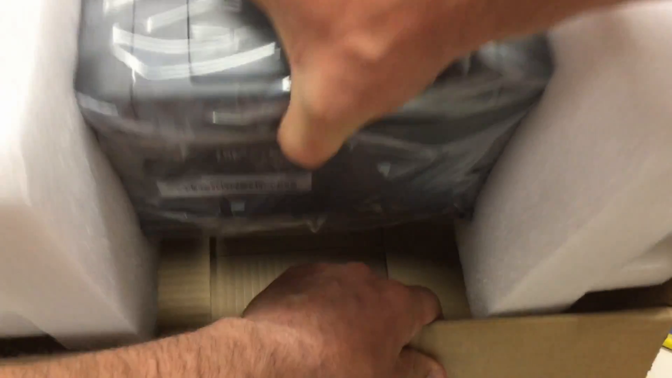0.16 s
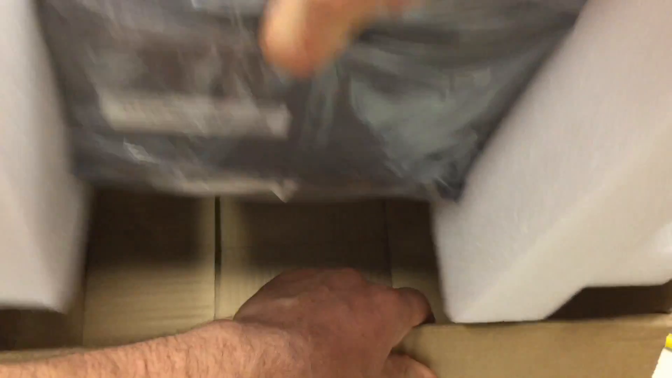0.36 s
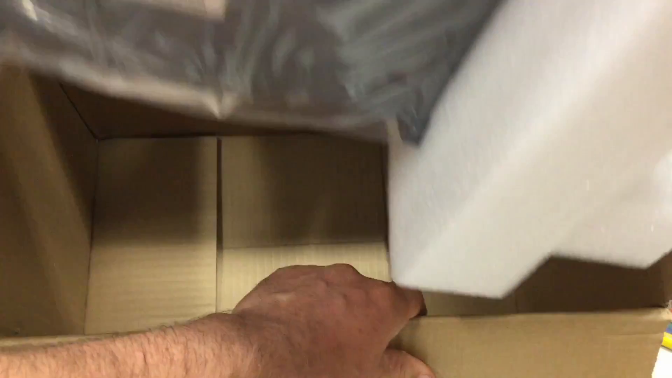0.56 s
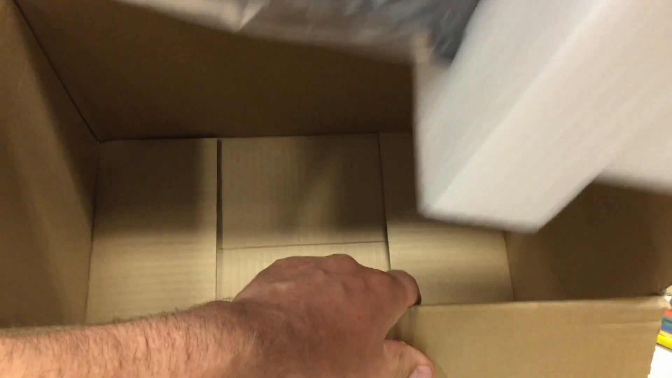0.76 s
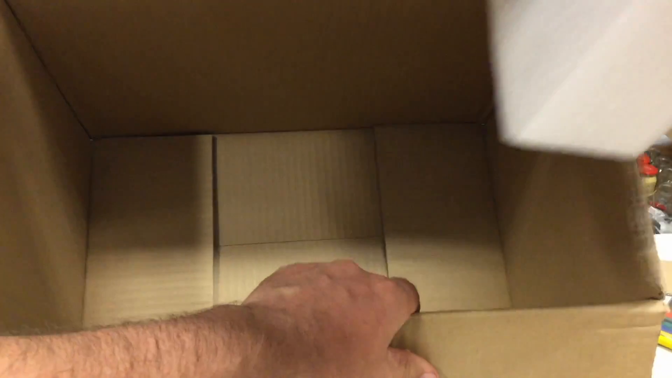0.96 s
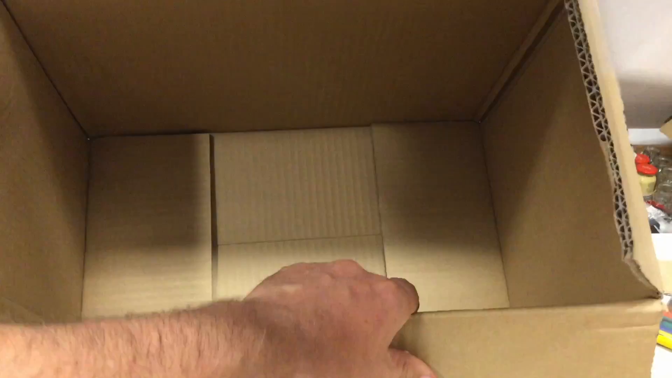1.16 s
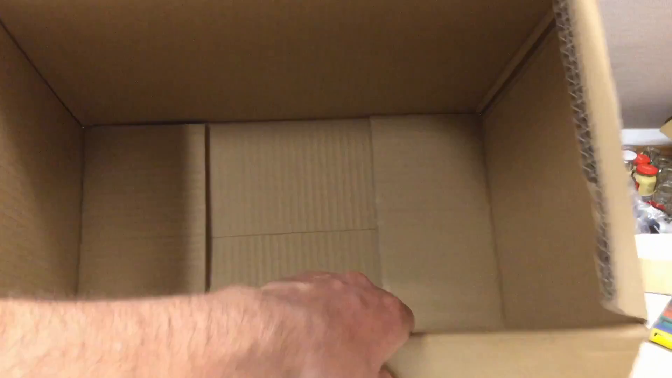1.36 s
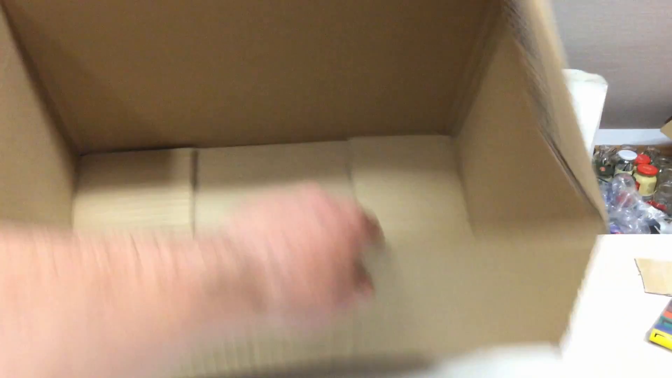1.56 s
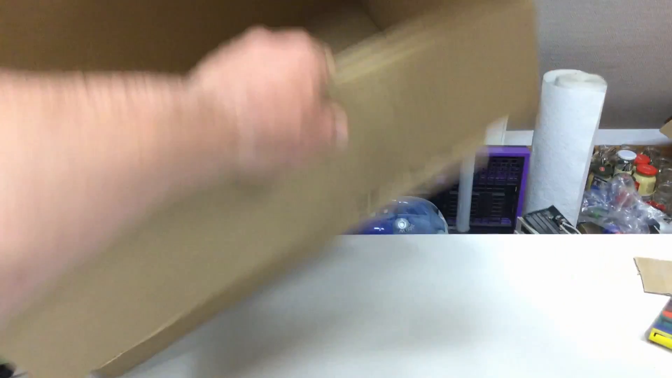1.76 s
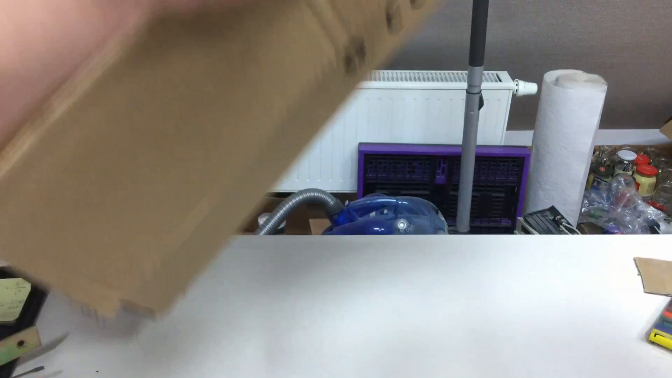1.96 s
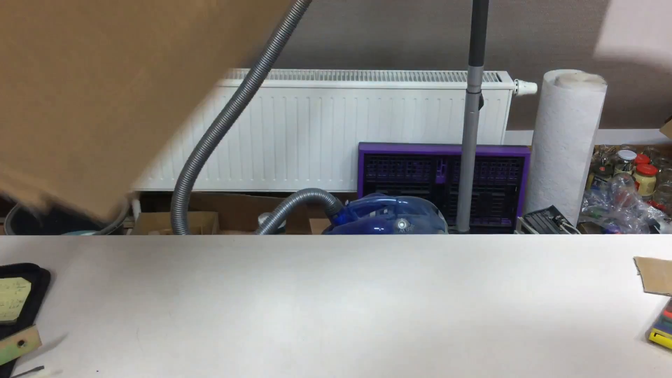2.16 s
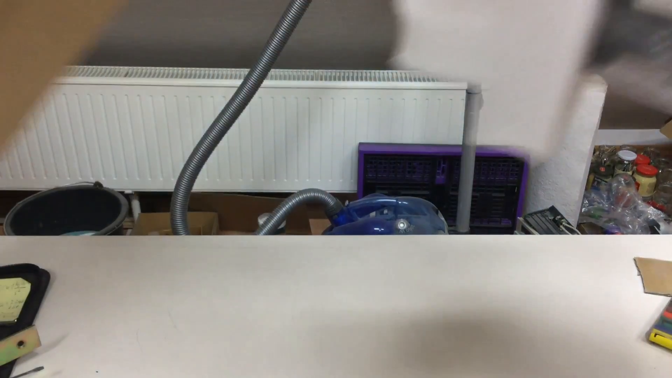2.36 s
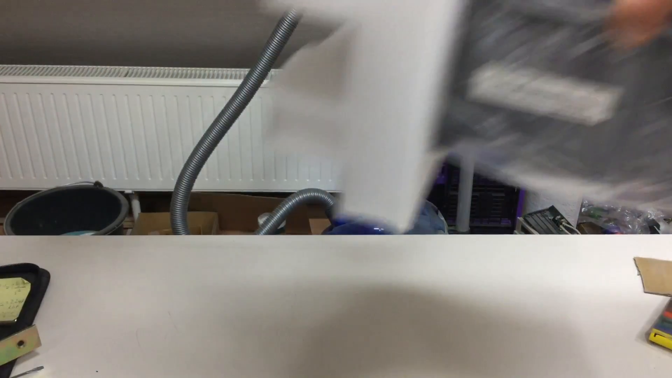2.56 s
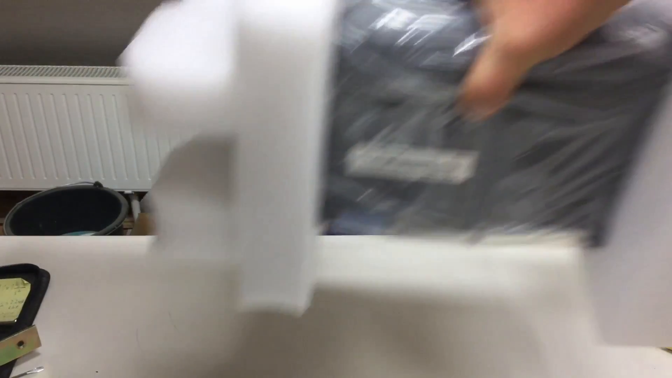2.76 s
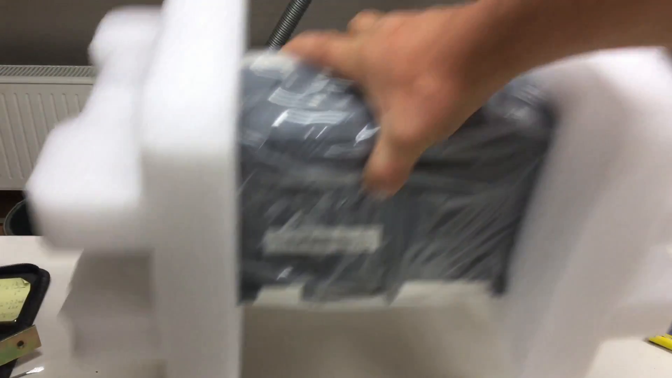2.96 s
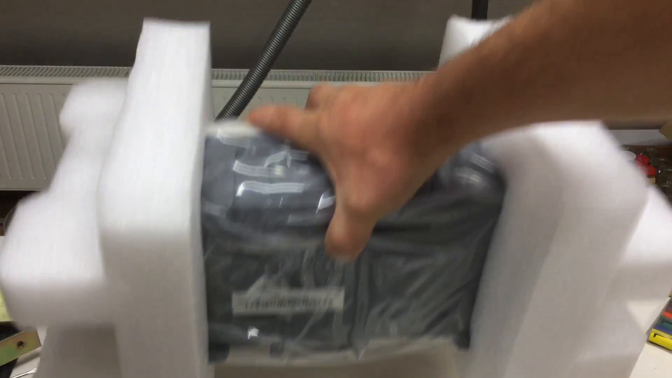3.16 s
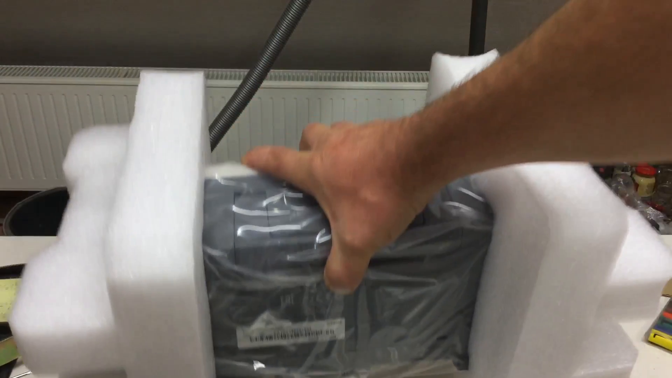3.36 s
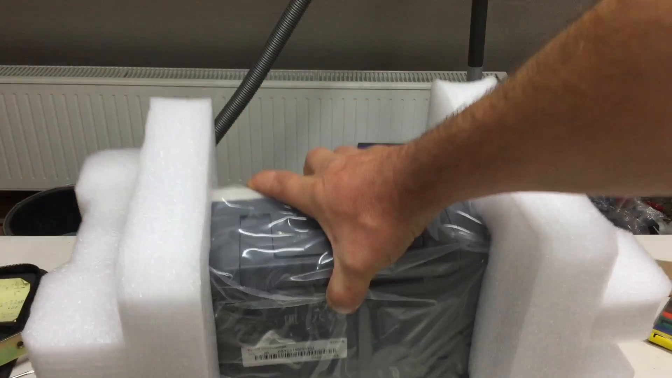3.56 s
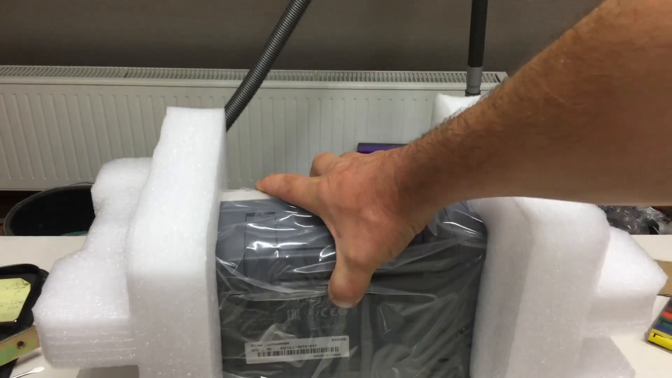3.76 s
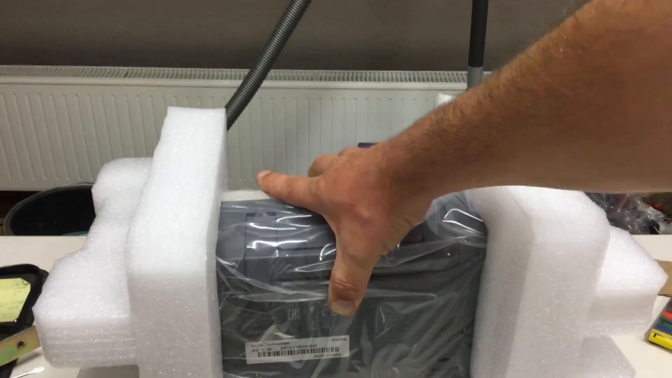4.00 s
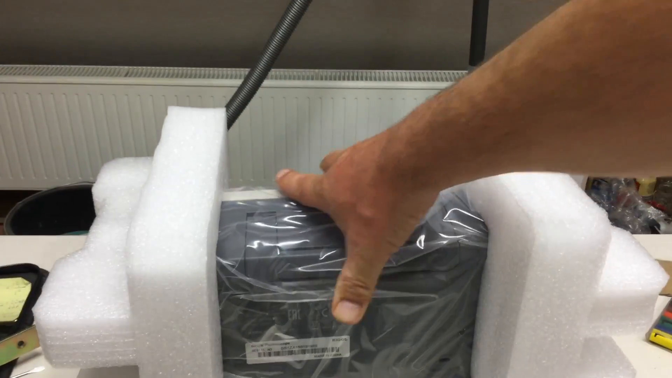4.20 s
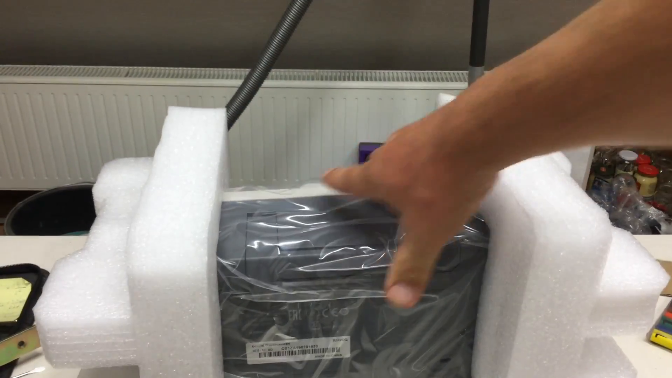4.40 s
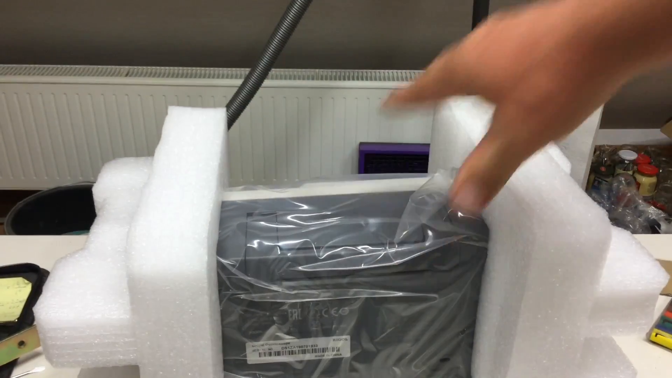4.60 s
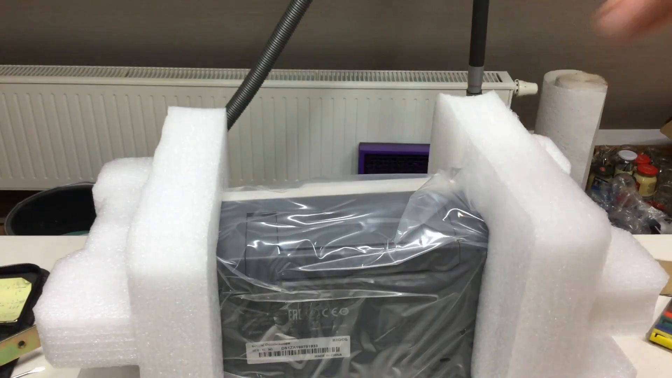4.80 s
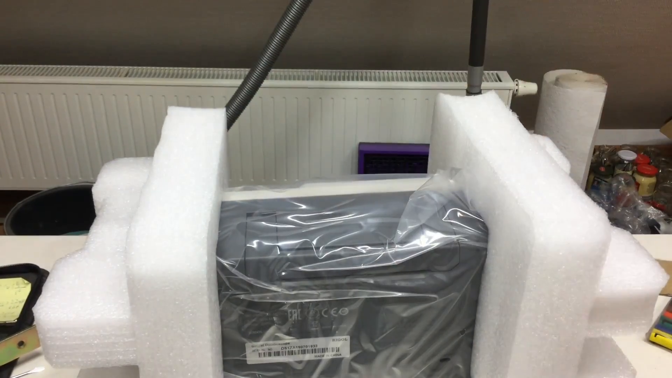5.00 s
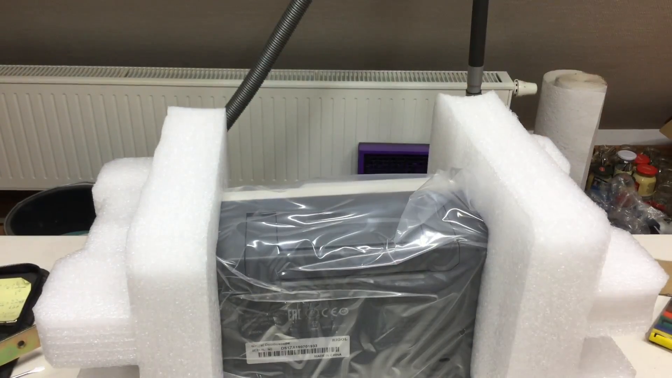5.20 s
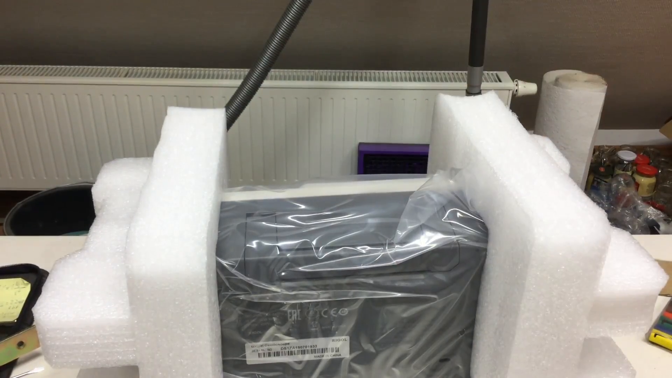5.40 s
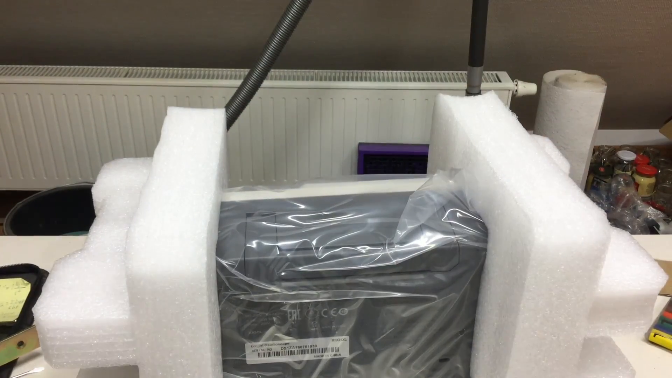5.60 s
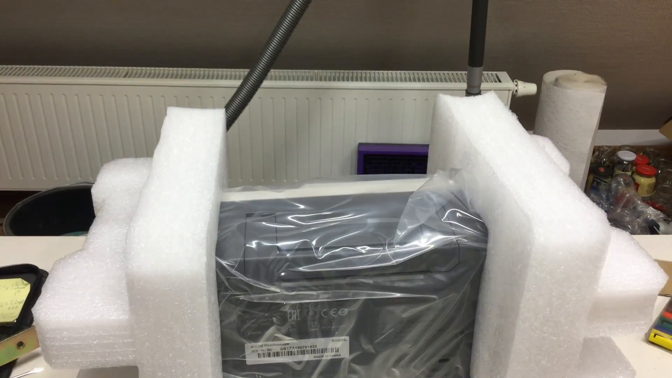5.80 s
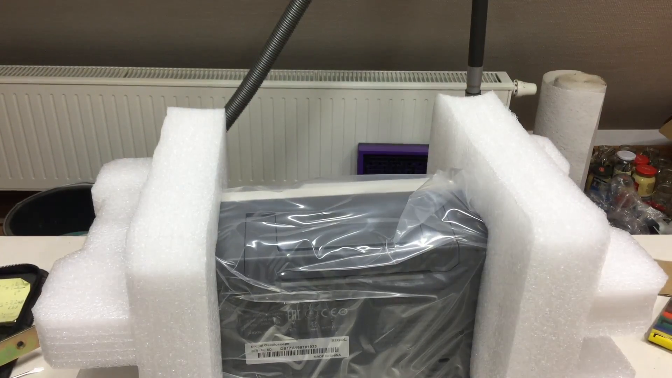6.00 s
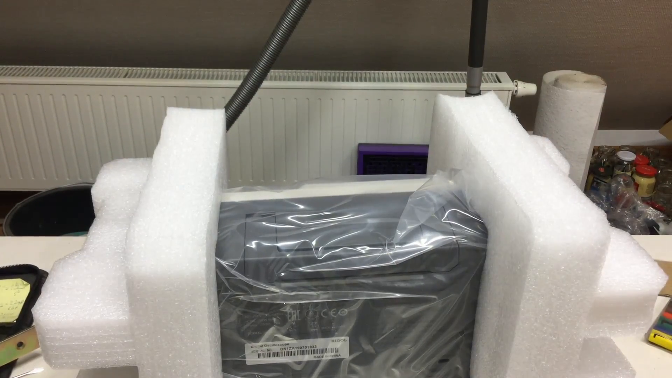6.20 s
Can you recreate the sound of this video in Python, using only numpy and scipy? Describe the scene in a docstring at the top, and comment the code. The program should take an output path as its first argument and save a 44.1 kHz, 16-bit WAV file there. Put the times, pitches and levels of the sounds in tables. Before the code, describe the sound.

Close handling in a small, quiet workroom over faint room noise. From 0 to 0.35 s, two strong tugs drag foam up cardboard: dense rough hiss with a hollow box drone and bag crackle. Shorter rubs follow from 0.48, with a loud knock and deep wall boom at 0.57; the scrape thins and flicks sharply off the rim at 0.94-0.98. Faint brushing and a low bump come at 1.3-1.4, then dry box knocks and skids at 1.6-1.9. A soft airy swish passes from 1.9 to 2.7. The padded pack touches down with light knocks, a fuller thud at 3.11, a brief low foam squeak at 3.35-3.42, and a sharper knock cluster at 3.65-3.9. Crisp plastic crinkles peak at 4.0-4.26, with smaller ones at 4.6-4.9. Near-quiet follows, with film snaps around 5.45, then soft hollow box bumps from 5.8 to 6.25.

```python
"""Foam hisses up cardboard walls, the box droning along, then flicks off the rim as the pack pops free.
The empty box knocks, booms, brushes and skids; an airy swish follows as box and pack swing aside.
The pack, an instrument in a bag and foam end caps, lands on a table with knocks and a squeak.
The bag crinkles as the hand lets go. Friction is noise or random slips under gain strokes, blows are
damped swings that ring body modes, film is short slip bursts through resonators; room and air lie behind."""
import sys
import numpy as np
from scipy import signal
from scipy.fft import rfft, irfft
from scipy.io import wavfile
from scipy.ndimage import map_coordinates

SR = 44100
rng = np.random.default_rng(int(sys.argv[2]) if len(sys.argv) > 2 else 0)


def wav_out(sig):
    """Save sig, one row per channel (or a flat mono array), as 16-bit PCM at SR to the path in sys.argv[1]."""
    wavfile.write(sys.argv[1], SR, np.round(np.clip(np.atleast_2d(sig).T, -1, 1) * 32767).astype(np.int16))


N = 275625
TIME = np.arange(N) / SR


def amp(db):
    """Decibels to gain."""
    return 10 ** (np.asarray(db) / 20)


def unit(x):
    """Scales to rms 1."""
    return x / np.sqrt(np.mean(x ** 2) + 1e-20)


def peaked(x):
    """Scales to peak 1."""
    return x / (abs(x).max() + 1e-20)


def attack_unit(x, size=600):
    """Scales a blow to rms 1 over its first moments."""
    return x / np.sqrt(np.mean(x[:size] ** 2) + 1e-20)


def read(points, hz):
    """Reads a table on a log-frequency axis."""
    f, value = np.transpose(points)
    return np.interp(np.log(hz + 1), np.log(f + 1), value)


def add(mix, s, sound):
    """Mixes a sound in at time s."""
    part = mix[max(round(s * SR), 0):][:len(sound)]
    part += sound[:len(part)]


def colour(x, spectrum):
    """Gives a signal a spectrum, at rms 1."""
    gain = amp(read(spectrum, np.fft.rfftfreq(len(x), 1 / SR)))
    return unit(irfft(rfft(x) * gain, len(x)))


def wander(rate_hz, size=N):
    """Smooth random drift of rms 1."""
    hz = np.fft.rfftfreq(size, 1 / SR)
    smoothing = np.exp(-(hz / rate_hz) ** 2)
    return unit(irfft(rfft(rng.standard_normal(size)) * smoothing, size))


def resonate(x, hz, q):
    """One resonance; its width is capped at a third of the sample rate."""
    width_hz = min(hz / q, SR / 3)
    return signal.lfilter(*signal.iirpeak(hz, hz / width_hz, SR), x)


def slips(per_s, spread_db):
    """A random train of tiny slips of uneven size, at rms 1."""
    size = amp(spread_db * np.minimum(rng.exponential(1, N), 4.5))
    happens = rng.random(N) < per_s / SR
    return unit(size * rng.standard_normal(N) * happens)


def buckles(fade_s, rise_s, per_s, size=6000):
    """A run of tiny slips that swells and dies away."""
    t = np.arange(size) / SR
    grains = rng.standard_normal(size) * (rng.random(size) < per_s / SR)
    return grains * np.exp(-t / fade_s) * (1 - np.exp(-t / rise_s))


def ring(modes, size=16000):
    """Decaying modes of a body; random weights stand for the spot that is hit."""
    t = np.arange(size) / SR
    weights = rng.uniform(.75, 1.25, len(modes)) * rng.choice([-1, 1], len(modes))
    return sum(w * amp(db - 60 * t / t60) * np.sin(2 * np.pi * hz * t)
               for w, (hz, db, t60) in zip(weights, modes))


def stroke(start, end, rise_s, fade_s):
    """One movement: it gathers speed, holds, and dies away after its end."""
    rise = 1 - np.exp(-np.maximum(TIME - start, 0) / rise_s)
    return rise * np.exp(-np.maximum(TIME - end, 0) / fade_s)


def strokes(rows, rise_s, hiss_fade_s, body_fade_s):
    """Gain of the hiss and of the body under a series of strokes; overlaps sum in power."""
    hiss = sum((amp(db) * stroke(start, end, rise_s, hiss_fade_s)) ** 2 for start, end, db, _ in rows)
    body = sum((amp(db) * stroke(start, end, rise_s, body_fade_s)) ** 2 for start, end, _, db in rows)
    return np.sqrt(hiss), np.sqrt(body)


def patchy(x, depth_db, life_s, span_hz):
    """The contact patch keeps shifting, so neighbouring bands swell and sink on their own."""
    hz, t, z = signal.stft(x, SR, nperseg=512, noverlap=384)
    field = rng.standard_normal((4000, 200))
    place = np.meshgrid(t / max(life_s, .003), hz / max(span_hz, 120))
    gain = amp(depth_db * map_coordinates(field, place, order=1, mode="nearest"))
    return unit(signal.istft(z * gain, SR, nperseg=512, noverlap=384)[1][:N])


def flex(hz, cycles, rise, size=8000):
    """A panel is pushed in and swings back, heavily damped; it radiates little far below its pitch."""
    turns = hz * np.arange(size) / SR
    decay = np.exp(-turns / max(cycles, .2))
    swing = np.sin(2 * np.pi * turns) * decay * (1 - np.exp(-turns / rise))
    return signal.lfilter(*signal.butter(2, hz / 4, "high", fs=SR), swing)


# Quiet room noise, spectrum: f/Hz, relative level/dB
AIR_SPECTRUM = [(15, -61), (25, 3), (144, -1.5), (204, 0.5), (410, -2.5), (871, -3), (1170, -8),
                (1750, -10.5), (2420, -14), (2920, -13), (4150, -15), (14300, -20.5), (15500, -22)]


def air(noise_db=-65, hum_db=-79, hum_hz=104.7):
    """Quiet broadband room noise with a faint sine hum."""
    noise = colour(rng.standard_normal(N), AIR_SPECTRUM)
    hum = unit(np.sin(2 * np.pi * hum_hz * TIME))
    return amp(noise_db) * noise + amp(hum_db) * hum


# Room decay: f/Hz, t60/s
ROOM_DECAY = [(100, 0.48), (260, 0.19), (700, 0.17), (2000, 0.36), (5000, 0.34), (14000, 0.1)]


def room(x, size=24000):
    """A small workroom: sparse reflections, each band dying at its own speed."""
    late_enough = np.arange(size) / SR > .005
    taps = rng.choice([-1., 1.], size) * (rng.random(size) < 3000 / SR) * late_enough
    hz, t, z = signal.stft(taps, SR, nperseg=256)
    decay = amp(-60 * t / read(ROOM_DECAY, hz)[:, None])
    tail = signal.istft(z * decay, SR, nperseg=256)[1]
    return signal.fftconvolve(x, tail / np.linalg.norm(tail))[:N]


def in_box(x, size=3000, fade_s=0.013, echo_db=-11.5):
    """Close reflections between the cardboard walls carve fixed fine peaks into a sound."""
    echoes = buckles(fade_s, rise_s=0.00088, per_s=2500, size=size)
    echoed = signal.fftconvolve(x, echoes / np.linalg.norm(echoes))[:len(x)]
    return unit(x + amp(echo_db) * echoed)


# Tugs that drag the foam up the cardboard:
# start t/s, end t/s, hiss level/dB, box wall drone level/dB (before the drone trim)
TUGS = [(-0.02, 0.19, -41, -47), (0.19, 0.355, -37.5, -46), (0.479, 0.56, -41.5, -46),
        (0.489, 0.56, -43, -49.5), (0.56, 0.65, -45, -68), (0.65, 0.93, -51.5, -62.5),
        (0.77, 0.87, -55.5, -41.5)]
# Foam wedged deep in the box; also colours knock scuffs and film snaps: f/Hz, relative level/dB
SCRAPE_DEEP = [(290, -6.5), (500, -4), (758, -0.5), (815, 1.5), (901, -2.5), (1060, -0.5), (1510, -7),
               (2100, -1.5), (3330, -4), (4640, -5), (6090, -5.5), (12500, -11), (15500, -15)]
# One end cap left on the rim: f/Hz, relative level/dB
SCRAPE_AT_RIM = [(530, -17), (850, -21), (1130, -4.5), (1380, -15), (1770, -6), (2250, -9.5), (2500, -6),
                 (3070, -16.5), (3800, -12), (5310, -17.5), (7320, -15), (12200, -18.5), (15500, -24)]
# Drone of the box walls: f/Hz, relative level/dB
WALL_DRONE = [(30, -24), (64, 5.5), (120, -11), (200, -3), (265, -1), (400, -8.5), (560, 0.5), (830, 1.5),
              (1150, -5), (1400, -11), (3500, -42), (7000, -62)]
# Ringing of the cardboard box, also under its knocks: f/Hz, relative level/dB, t60/s
BOX_MODES = [(104, -21, 0.35), (134.3, -7.5, 0.44), (156.5, -1.5, 0.15), (201.3, 0.5, 0.16),
             (302.3, -2.5, 0.14), (359, -1.5, 0.14), (494, -2.5, 0.12), (636, -6.5, 0.13), (702, -8, 0.11),
             (811, -7.5, 0.094), (1100, -9, 0.06), (1800, 0, 0.036), (2240, -26, 0.074), (2530, -15, 0.046)]
DRONE_FADE_S = 0.094  # low bodies linger after a tug or a brush


def pull(crackle_db=-13, judder_db=0.5, lumps_db=1.0, creep_db=-53, creep_drone_db=1, drone_trim_db=-1.5):
    """Foam catches and slips on cardboard as dense hiss, while a train of pushes drones and rings the walls."""
    rise_s, fade_s = 0.0034, 0.017
    hiss, drone = strokes(TUGS, rise_s, fade_s, DRONE_FADE_S)
    # between tugs the foam keeps creeping until it is free
    creep = amp(creep_db) * stroke(0, 1, rise_s, fade_s=0.035)
    hiss = np.hypot(hiss, creep)
    drone = np.hypot(drone, amp(creep_drone_db) * creep)

    cells = rng.standard_normal(N) * amp(judder_db * wander(rate_hz=52))
    at_rim = np.interp(TIME, [.6, .7], [0, 1])
    deep = (1 - at_rim) * colour(cells, SCRAPE_DEEP)
    scrape = deep + amp(-0.5) * at_rim * colour(cells, SCRAPE_AT_RIM)
    scrape = in_box(patchy(scrape, depth_db=3.0, life_s=0.0394, span_hz=266))
    # the bag creases under the strain
    crackle = unit(resonate(slips(per_s=510, spread_db=3.5), 3000, q=0.22))
    scrape = scrape + amp(crackle_db) * crackle

    push = slips(per_s=6000, spread_db=1.5) * amp(lumps_db * wander(rate_hz=12))
    ringing = unit(signal.fftconvolve(push, ring(BOX_MODES))[:N])
    walls = unit(colour(push, WALL_DRONE) + ringing)
    return hiss * scrape + amp(drone_trim_db) * drone * walls


# The bag peels off skin and foam in bursts of tiny slips: t/s, peak level/dB, centre f/Hz
RASPS = [(0.224, -22, 3340), (2.814, -46.5, 4630), (3.087, -53, 2300), (3.111, -38.5, 4150),
         (4.048, -39, 5580), (4.0914, -34, 3000), (4.114, -29, 2800), (4.159, -43.5, 2300),
         (4.2409, -31, 2720), (4.262, -31.5, 2600), (4.664, -47, 4500), (5.353, -53, 4500)]
# Creases snap singly as the film settles: t/s, peak level/dB, ring f/Hz, hiss level/dB re ring
SNAPS = [(0.4266, -31, 4350, 16), (1.052, -44, 2700, 2), (2.027, -45, 8200, 3), (2.234, -46, 2980, 9),
         (2.847, -52, 7100, 0), (2.9663, -49, 7000, -5), (2.972, -51, 7400, -9), (2.998, -59, 7000, -5),
         (3.011, -55, 6700, -5), (3.0215, -52, 2200, 3), (3.0355, -53, 6860, 0), (3.0645, -54, 3200, 11),
         (3.1675, -41, 3030, 21), (3.187, -58, 2400, 2), (3.203, -47.5, 3500, -7), (3.2165, -47, 2380, 3),
         (3.249, -45, 5400, 1), (3.278, -54, 2330, 3), (3.292, -44.5, 9000, -6), (3.42, -47, 6200, 3),
         (3.427, -41.5, 9000, 3), (3.5255, -62, 2910, 5), (3.531, -53, 6200, 2), (3.5593, -51, 2900, -4),
         (3.5705, -45, 5850, 7), (3.714, -50, 2570, -1), (3.7725, -54, 7800, 0), (3.934, -48.5, 2900, -8),
         (4.002, -36, 3370, 7), (4.0287, -28.5, 5500, 11), (4.0456, -32.5, 5200, 5), (4.06, -28, 5800, 7),
         (4.0739, -34, 5040, -23), (4.2379, -32, 5500, 7), (4.2518, -31, 5200, 2), (4.4282, -42, 2200, 12),
         (4.6252, -38.5, 4620, 8), (4.65, -57, 2810, 4), (4.7143, -53, 2800, 7), (4.779, -51.5, 2880, -9),
         (4.8833, -54, 2700, -12), (4.906, -46, 3500, 20), (4.921, -44, 2920, 16), (4.9295, -52, 5800, -6),
         (4.977, -57, 3010, -8), (5.021, -46.5, 3750, 4), (5.033, -49, 2880, -2),
         (5.277, -52.5, 11000, -11), (5.337, -56, 12000, -11), (5.436, -47.5, 11700, -6),
         (5.448, -36.5, 6900, -16), (5.484, -38, 4700, 10), (5.91, -39.5, 5850, -9)]


def crinkles(rasp_hiss_db=1, hiss_hz=5000):
    """Each peel or snap rings its own patch of film over a broad hiss."""
    out = np.zeros(N)
    for s, db, hz in RASPS:
        run = buckles(fade_s=0.0048, rise_s=0.0013, per_s=4500)
        patch = unit(resonate(run, hz, q=12.0))
        hiss = unit(resonate(run, hiss_hz, q=0.79))
        add(out, s, amp(db) * peaked(patch + amp(rasp_hiss_db) * hiss))
    for s, db, hz, hiss_db in SNAPS:
        run = buckles(fade_s=0.001, rise_s=0.00021, per_s=16000)
        patch = unit(resonate(resonate(run, hz, q=4.5), hz, q=4.5))
        add(out, s, amp(db) * peaked(patch + amp(hiss_db) * colour(run, SCRAPE_DEEP)))
    return out


# The foam edge flicks past the rim of the box: t/s, peak level/dB, edge f/Hz, swell/s, fade/s
FLICKS = [(0.549, -29, 895, 0.0045, 0.0046), (0.648, -31.5, 1100, 0.0039, 0.0021),
          (0.926, -32, 1500, 0.0027, 0.0026), (0.939, -20.5, 1110, 0.0046, 0.0024),
          (0.98, -24.5, 1270, 0.00082, 0.0053), (0.9896, -35, 1780, 0.002, 0.0015)]
# Ringing of the cardboard rim: f/Hz, relative level/dB, t60/s
RIM_MODES = [(683, 4, 0.24), (1105, 9, 0.071), (1193, -11, 0.3), (1290, -22, 0.2), (1730, 0, 0.083),
             (1790, 4.5, 0.068), (1850, 1, 0.089), (2560, -5, 0.09)]


def flicks(hiss_db=-1, size=12000):
    """The foam edge rasps ever louder over the cardboard rim, slips off and leaves it ringing."""
    out, t = np.zeros(N), np.arange(-size // 4, size) / SR
    for s, db, hz, swell_s, fade_s in FLICKS:
        envelope = np.exp(-abs(t) / np.where(t < 0, swell_s, fade_s))
        run = rng.standard_normal(len(t)) * envelope
        edge = unit(resonate(run, hz, q=1.4))
        rim = unit(signal.fftconvolve(edge, ring(RIM_MODES))[:len(run)])
        hiss = unit(resonate(run, 3300, q=0.23))
        add(out, s + t[0], amp(db) * peaked(edge + amp(hiss_db) * hiss + rim))
    return out


def knocks(rows, modes, cycles, ring_db, give_s, scuff_db, scuff_s, clatter_db, clatter_s,
           clatter_octaves, crest_db=7, size=11000):
    """The padding gives for a moment; then the blow flexes the spot, chatters, rings the body and scuffs it."""
    out, t = np.zeros(N), np.arange(size) / SR
    for s, db, hz, bright_db in rows:
        blow = flex(hz, cycles, rise=0.08, size=size)
        top_hz = np.clip(hz * 2 ** clatter_octaves, 900, 1800)
        band = signal.butter(4, [200, top_hz], "band", fs=SR, output="sos")
        chatter = signal.sosfilt(band, rng.standard_normal(size) * np.exp(-t / clatter_s))
        body = signal.fftconvolve(blow, ring(modes))[:size]
        sound = unit(blow) + amp(clatter_db) * unit(chatter) + amp(ring_db) * unit(body)
        scuff = colour(buckles(scuff_s, rise_s=0.0014, per_s=18000, size=size), SCRAPE_DEEP)
        hit = attack_unit(sound) + amp(bright_db + scuff_db) * attack_unit(scuff)
        add(out, s + give_s, amp(db - crest_db) * hit)
    return out


# Knocks on the empty box: touch t/s, nominal peak level/dB, struck spot f/Hz,
# scuff level/dB re knock (before scuff_db)
BOX_KNOCKS = [(0.549, -27, 814, -19), (0.5625, -21.5, 330, -16), (0.64, -37.5, 580, -7),
              (0.9365, -31.5, 594, -9), (0.976, -38, 526, -10.5), (1.583, -53, 590, -3),
              (1.5895, -34.5, 440, -23), (1.699, -42, 560, -12), (1.702, -36.5, 510, -15),
              (1.709, -36.5, 375, -27), (1.735, -38, 430, -15), (1.807, -52, 557, -2.5),
              (1.86, -48, 614, -10.5), (1.993, -56.5, 450, -4.5), (2.035, -53.5, 397, -26),
              (2.332, -54.5, 480, -0.5), (5.803, -41.5, 346, -11), (5.91, -50, 520, -6),
              (5.93, -43.5, 490, -16), (5.938, -49, 417, -10), (5.961, -41, 560, -13),
              (6.081, -44.5, 473, -20), (6.186, -38.5, 700, -12.5), (6.2385, -39, 614, -13),
              (6.244, -37.5, 400, -26)]


def box_knocks():
    """Blows flex the cardboard walls and ring the hollow box."""
    return knocks(BOX_KNOCKS, BOX_MODES, cycles=0.74, ring_db=-1, give_s=.0018, scuff_db=0.5, scuff_s=0.016,
                  clatter_db=-3, clatter_s=0.011, clatter_octaves=0.76)


# Deep flops of a whole wall: push t/s, peak level/dB (before trim), f/Hz, decay/cycles (at least 0.2)
FLOPS = [(0.5685, -14.5, 203, 0.8), (0.5753, -37, 173, 5.2), (0.65, -43, 99, 0.96), (0.988, -32, 141, 1.8),
         (1.292, -49, 164, 5.7), (1.385, -42.5, 61.4, 1.3), (1.597, -43, 65, 1.2),
         (1.712, -35.5, 152, 0.45), (2.512, -48, 292, 3), (2.799, -45.5, 230, 1.1), (3.05, -48, 149, 0.93),
         (3.112, -37.5, 196, 0.52), (4.111, -36.5, 108, 0.16), (5.98, -44.5, 69.7, 3.1),
         (6.191, -44, 148, 2.2), (6.242, -35.5, 109, 2.4)]


def flops(give_s=0.00305, trim_db=-1.5):
    """A whole wall bows, then springs back with a short boom."""
    out = np.zeros(N)
    for s, db, hz, cycles in FLOPS:
        add(out, s + give_s, amp(db) * peaked(flex(hz, cycles, rise=0.06)))
    return amp(trim_db) * out


# Light strokes of hand, bag and box against each other:
# start t/s, end t/s, hiss level/dB, body level/dB (before body trim)
BRUSHES = [(1.285, 1.41, -61, -55), (1.48, 1.6, -63.5, -56.5), (1.55, 1.6, -59.5, -59),
           (1.72, 1.87, -75, -57), (2.74, 2.88, -72, -67.5), (2.94, 3.28, -90, -77),
           (3.295, 3.42, -69.5, -71), (3.61, 3.69, -63.5, -67.5), (3.785, 3.83, -64, -62),
           (3.965, 4.11, -58, -65), (4.12, 4.28, -65, -66), (4.645, 4.715, -64, -63.5),
           (5.78, 5.99, -84, -56.5), (6.07, 6.25, -74, -65)]
# Bright sliding hiss: f/Hz, relative level/dB
BRUSH_HISS = [(500, -16), (1000, 4), (2300, 8.5), (4000, 3), (8000, 4), (12500, -1), (15500, -0.5)]
# Low rumble of the brushed box: f/Hz, relative level/dB
BRUSH_BODY = [(25, -46), (65, 2.5), (110, -6.5), (180, 1.5), (260, -13), (450, -9), (1000, -18.5),
              (2000, -28.5), (5000, -34)]


def brush(body_trim_db=-1, crackle_db=-12):
    """Soft sliding of skin, film and card, with stray crackles and a low rumble from the box."""
    hiss, body = strokes(BRUSHES, 0.0045, 0.018, DRONE_FADE_S)
    pressure = amp(1.3 * wander(rate_hz=35))
    fizz = colour(slips(per_s=12000, spread_db=2.5), BRUSH_HISS)
    crackle = sum(unit(resonate(slips(per_s=40, spread_db=2.0), hz, q=3.7))
                  for hz in (1750, 2860, 4580, 6600, 10300)) / 2
    rumble = colour(slips(per_s=2300, spread_db=-0.5), BRUSH_BODY)
    sliding = hiss * (fizz + amp(crackle_db) * crackle)
    return pressure * (sliding + amp(body_trim_db) * body * rumble)


# The box skids briefly under the hand and on the table: t/s, peak level/dB, fade/s
SKIDS = [(1.286, -45.5, 0.01), (1.587, -43, 0.0083), (1.7016, -36, 0.0075), (1.7104, -40, 0.0039),
         (1.736, -45, 0.0071), (1.774, -45.5, 0.005), (1.835, -49, 0.0072)]
# Dry scuff of the cardboard wall: f/Hz, relative level/dB
WALL_SCUFF = [(400, -12), (1100, 9.5), (1600, -5), (2200, 4.5), (3500, -7.5), (4600, -3), (8000, -14),
              (15500, -12)]


def skids():
    """Short dry scrapes of the empty box, each a dying run of tiny slips."""
    out = np.zeros(N)
    for s, db, fade_s in SKIDS:
        scuff = colour(buckles(fade_s, rise_s=0.0014, per_s=17000), WALL_SCUFF)
        add(out, s, amp(db) * peaked(scuff))
    return out


# Box and pack swing through the air: start t/s, end t/s, level/dB
SWISH = (1.85, 2.7, -65.5)
# Airy hiss: f/Hz, relative level/dB
SWISH_HISS = [(150, 9), (500, -1), (1000, -33), (2000, -44), (4000, -4.5), (7000, -1), (11000, -1),
              (15500, -9)]
# Echo off the table: t/s, lag/s
SWISH_ECHO = [(1.85, 0.00025), (2.0, 0.000245), (2.1, 0.00031), (2.2, 0.00036), (2.4, 0.00027),
              (2.55, 0.00031), (2.8, 0.00035)]


def swish(echo=.42):
    """A smooth hiss combed by its echo off the table; the comb bands move as the path length changes."""
    start, end, db = SWISH
    hiss = colour(slips(per_s=24000, spread_db=3.0), SWISH_HISS)
    hiss = patchy(hiss, depth_db=2, life_s=0.04, span_hz=500)
    lag = np.interp(TIME, *np.transpose(SWISH_ECHO))
    combed = unit(hiss + echo * np.interp(TIME - lag, TIME, hiss))
    return amp(db) * stroke(start, end, rise_s=0.15, fade_s=0.058) * combed


# Knocks of the pack on the table: touch t/s, nominal peak level/dB, struck spot f/Hz,
# scuff level/dB re knock (before scuff_db)
PACK_KNOCKS = [(2.5045, -46.5, 790, -11.5), (2.646, -51.5, 415, -24), (2.739, -56, 480, -3),
               (2.794, -44, 715, -15), (2.812, -52, 850, 0), (2.873, -51.5, 516, -13),
               (2.945, -61.5, 450, 1), (3.0465, -40.5, 530, -13.5), (3.1105, -32.5, 336, -18),
               (3.1115, -41, 940, -29), (3.24, -58, 430, -8), (3.521, -55, 425, -7), (3.654, -45, 482, -29),
               (3.661, -38.5, 390, -31), (3.674, -43, 377, -16), (3.739, -40.5, 800, -23),
               (3.827, -26.5, 990, -18.5), (3.834, -38.5, 390, -31), (3.8485, -33, 1020, -32),
               (3.8545, -48, 590, -15), (3.8695, -44, 470, -7.5), (3.881, -44, 680, -22),
               (3.891, -41, 860, -26), (3.925, -40.5, 514, -11), (3.973, -52.5, 400, -11),
               (3.9985, -49.5, 815, -14), (4.043, -45.5, 487, 0), (4.096, -42, 520, -23),
               (4.158, -64, 520, -1), (4.205, -50, 825, -5), (4.241, -42.5, 380, -2)]
# Ringing of the packed instrument on the table, also under the squeak: f/Hz, relative level/dB, t60/s
PACK_MODES = [(191, 11, 0.1), (264, -2.5, 0.13), (310, 4, 0.051), (369.4, 10.5, 0.099), (411, -3, 0.15),
              (465, -0.5, 0.2), (606, 2.5, 0.097), (743, 0, 0.13), (903, 0.5, 0.084), (1043, -13.5, 0.29),
              (1114, 2, 0.1), (1237, 0, 0.21), (1500, -7, .13)]


def pack_knocks():
    """Padded blows ring the packed instrument on the table."""
    return knocks(PACK_KNOCKS, PACK_MODES, cycles=1.0, ring_db=0.5, give_s=0.003, scuff_db=1.5, scuff_s=0.0058,
                  clatter_db=-2.5, clatter_s=0.012, clatter_octaves=0.49)


# Squeak contour: t/s, level/dB, f/Hz
SQUEAK = [(3.349, -66, 606), (3.357, -50.5, 644), (3.365, -50.5, 620), (3.378, -53.5, 619),
          (3.388, -49.5, 630), (3.397, -61, 590), (3.41, -59, 603), (3.42, -77, 600)]
# Harmonics of the squeak, from the fundamental up: relative level/dB
SQUEAK_HARMONICS = [-0.5, -8, -13, -19, -21.5, -34, -39, -35, -30]


def squeak(grit_db=-14, ring_db=-7, rough=.04, shimmer_db=4):
    """Foam sticks and slips unevenly on the table top; each slip sheds a puff of grit and rings the pack."""
    s, db, hz = np.transpose(SQUEAK)
    t, out = np.arange(s[0], s[-1], 1 / SR), np.zeros(N)
    pitch = np.interp(t, s, hz) * (1 + rough * wander(rate_hz=350, size=len(t)))
    turns = np.cumsum(pitch) / SR
    tone = sum(amp(part + shimmer_db * wander(rate_hz=140, size=len(t))) * np.sin(2 * np.pi * k * turns)
               for k, part in enumerate(SQUEAK_HARMONICS, 1))
    puffs = rng.standard_normal(len(t)) * np.exp(-(turns % 1) / .3)
    grit = resonate(puffs, 3500, q=0.99)
    add(out, s[0], amp(np.interp(t, s, db)) * (unit(tone) + amp(grit_db) * unit(grit)))
    ringing = unit(signal.fftconvolve(out, ring(PACK_MODES))[:N])
    return out + amp(ring_db) * out.std() * ringing


def scene():
    """All the handling, close up, with the room behind it; both channels alike."""
    rubbing = pull() + brush() + swish()
    blows = box_knocks() + pack_knocks() + flops() + squeak() + skids()
    rim, film = flicks(), crinkles()
    to_room = amp(-25.5) * rubbing + amp(-9.0) * blows + amp(-13.0) * rim + amp(-16.5) * film
    mono = rubbing + blows + rim + film + room(to_room) + air()
    return np.array([mono, mono])


def record(dry, edge_hz=15550):
    """A steep low-pass closes the top of the band."""
    low_pass = signal.firwin(511, edge_hz, window=("kaiser", 9), fs=SR)
    return signal.oaconvolve(dry, low_pass[None], "same")


dry = scene()
out = record(dry)
wav_out(out)
```